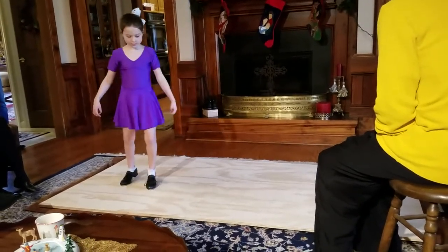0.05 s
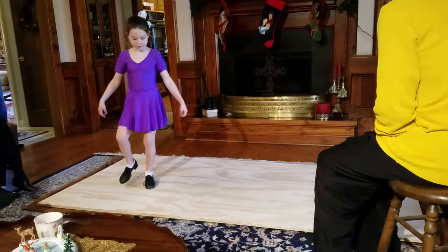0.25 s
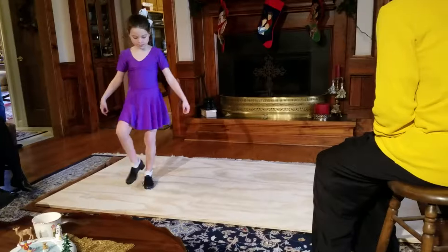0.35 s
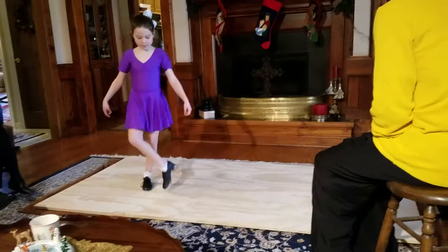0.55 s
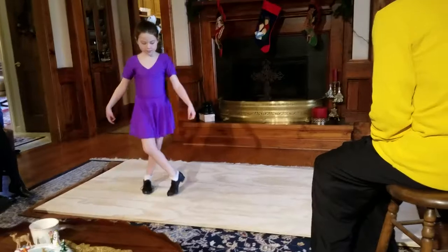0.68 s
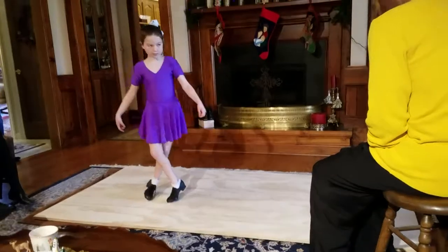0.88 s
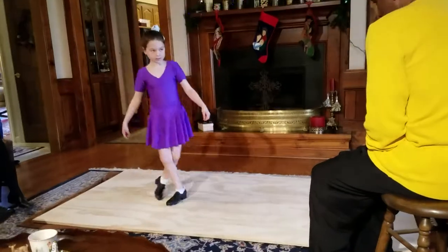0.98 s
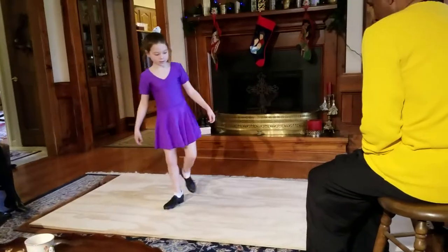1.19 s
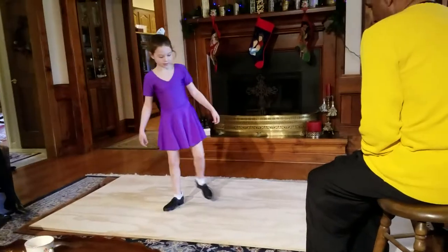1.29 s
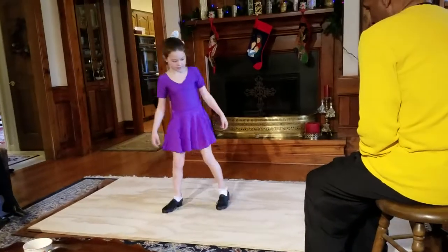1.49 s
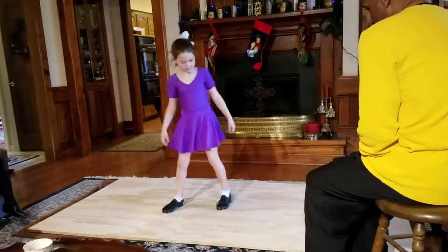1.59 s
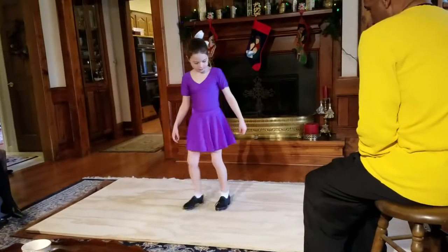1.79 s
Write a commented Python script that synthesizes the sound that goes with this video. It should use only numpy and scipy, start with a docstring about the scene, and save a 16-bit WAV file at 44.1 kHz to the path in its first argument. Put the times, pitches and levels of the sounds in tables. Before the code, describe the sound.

Tap shoes strike a ringing wooden board with a few unhurried, bright-edged knocks.

```python
"""A faint hiss, then slow steps in tap shoes on a wooden practice board laid over a rug in a living room.
Each step is a woody knock with a bright edge from the shoe's metal plate; the board rings,
the floor booms a little and the room answers with short echoes.
The hiss is the room's air and the microphone, which is a few metres away and louder on the left."""
import sys
import numpy as np
from scipy import signal
from scipy.fft import rfft, irfft, next_fast_len
from scipy.io import wavfile

SR = 44100
rng = np.random.default_rng(int(sys.argv[2]) if len(sys.argv) > 2 else 0)


def dump_mix(stems):
    """Bounce the given channels to the path in sys.argv[1] as a 16-bit WAV at rate SR."""
    frames = np.atleast_2d(stems).T  # one column per channel
    limited = np.clip(frames, -1, 1)  # hard clip at full scale
    pcm = np.round(limited * 32767).astype(np.int16)
    wavfile.write(sys.argv[1], SR, pcm)


N = 81585
T = np.arange(N) / SR
SIZE = next_fast_len(2 * N)
HZ = np.maximum(np.arange(SIZE // 2 + 1) * SR / SIZE, 1)


def from_db(db):
    """Turn decibels into a number to multiply by."""
    return 10 ** (np.asarray(db) / 20)


def fade(fade_s, db=0):
    """A level that starts at db and drops 60 dB every fade_s seconds (the fade time)."""
    return from_db(db - 60 * T / fade_s)


def at_hz(table):
    """Read a table's columns at every frequency, filling in between its rows."""
    points, *columns = np.transpose(table)
    return np.array([np.interp(np.log(HZ), np.log(points), column) for column in columns])


def colour(sound, db):
    """Turn each frequency up or down, letting nothing sound early (a minimum-phase filter)."""
    cepstrum = irfft(np.log(from_db(db)), SIZE)
    fold = 1 + np.sign(SIZE / 2 - np.arange(SIZE))
    fold[0] = 1
    return irfft(rfft(sound, SIZE) * np.exp(rfft(cepstrum * fold)), SIZE)[..., :N]


def stereo_noise(likeness):
    """Noise whose left and right range from unrelated (0) to the same (1) at each frequency."""
    mid, side = rfft(rng.standard_normal((2, SIZE)))
    shared = np.sqrt((1 + likeness) / 2) * mid
    opposite = np.sqrt((1 - likeness) / 2) * side * [[1], [-1]]
    return irfft(shared + opposite, SIZE)[:, :N]


# Tone of the hiss: f/Hz, left level/dB, right level/dB
HISS_TONE = [(25, -39.5, -42.5), (59.6, -42, -50.5), (140, -30.5, -39), (300, -34, -43.5),
             (460, -33.5, -42), (680, -38.5, -46), (1157, -32, -43), (2220, -39, -54.5), (4240, -55, -65.5),
             (6700, -60, -74), (8500, -73, -76.5), (10170, -62, -75.5), (12200, -45, -65.5),
             (15500, -55, -63)]
# How alike the hiss is on both sides: f/Hz, likeness/0-1
HISS_LIKENESS = [(150, 1), (500, 0.8), (1200, 0), (5000, .05)]
def hiss():
    """Steady air in the room and the microphone's own hiss."""
    return colour(stereo_noise(at_hz(HISS_LIKENESS)[0]), at_hz(HISS_TONE))


# How long the room keeps sounding: f/Hz, fade time/s
ROOM_FADES = [(70, 0.26), (180, 0.44), (500, 0.39), (1200, 0.33), (2800, .31), (6000, 0.23), (13000, 0.16)]
# Left against right: f/Hz, likeness of the room's sound/0-1, left minus right level/dB
STEREO = [(105, 0.78, 6), (278, 1, 9), (580, 0.78, 5.5), (1090, 0.22, 6), (2200, 0.23, 6.5),
          (4500, 0.51, 8), (8000, 0.35, 18.5), (14000, .5, 14)]
def room_tail(build_s, level_db=4):
    """Countless echoes blur into a wash that builds quickly; its highest notes die first."""
    noise = rfft(stereo_noise(at_hz(STEREO)[0]), SIZE)
    centres_hz, fades_s = np.transpose(ROOM_FADES)
    tail = 0
    for share, fade_s in zip(np.eye(len(centres_hz)), fades_s):
        band = irfft(noise * np.interp(np.log(HZ), np.log(centres_hz), share), SIZE)[:, :N]
        tail = tail + band * fade(fade_s)
    tail *= 1 - np.exp(-(T / build_s) ** 2)
    return from_db(level_db) * tail / np.sqrt(np.sum(tail ** 2) / 2)


# First echoes from floor, walls and ceiling: delay/s, level/dB
ECHOES = [(.0026, -9), (.0072, -15), (0.0135, -20), (.0195, -17.5), (.032, -19)]
def room_click(direct_db, echo_db, build_s, scatter_s=0.0005):
    """A click reaches the microphone straight, as echoes that shift with each step, and as a wash."""
    sound = room_tail(build_s)
    sound[:, 0] += from_db(direct_db)
    for delay_s, db in ECHOES:
        arrival = int(abs(delay_s + scatter_s * rng.normal()) * SR)
        sound[:, arrival] += from_db(db + echo_db)
    return sound


def floor_boom(hz=67.4, rise_s=0.092):
    """The deep note of floor and room swells under the dancer's weight."""
    swell = 1 - np.exp(-T / rise_s)
    return swell * fade(0.28, db=-22) * np.sin(2 * np.pi * hz * T)


# Notes of the wooden board, before the foot changes their length: f/Hz, level/dB, fade time/s
BOARD_NOTES = [(177, -10.5, 0.86), (222.4, 6, .35), (318, -1.5, 0.3), (400, -10, 0.25), (479.9, -1.5, 0.39),
               (512, -0.5, 0.4), (546, 4.5, .3), (592, 0, 0.24), (649.2, 5, 0.26), (721, 4, 0.38),
               (861, -1, 0.34), (892, -6, 0.25), (1034, -7, 0.2), (1084, -0.5, 0.27), (1158, -12.5, 0.44),
               (1300, -4.5, 0.4), (1640, -11.5, 0.19), (1934, -15.5, 0.26)]
def board_ring(level_db=-23.5, spread_db=4.5, rise_s=0.0042):
    """The board rings; each note's strength is left to chance."""
    ring = 0
    for k, (hz, db, fade_s) in enumerate(BOARD_NOTES):
        strength = fade(fade_s, level_db + db + spread_db * rng.normal())
        phase = 0.39 * rng.normal(size=(2, 1))  # left and right swing slightly apart
        ring = ring + (-1) ** k * strength * np.sin(2 * np.pi * hz * T + phase)
    return ring * (1 - np.exp(-(T / rise_s) ** 2))


# Very short notes where sole meets board: f/Hz, level/dB, fade time/s
CRACK_NOTES = [(362.3, -37.5, 0.027), (691, -37, 0.0083), (1252, -36, 0.033), (1898, -32, 0.021)]
def crack():
    """The first sharp swings of sole and board, heard straight from the foot."""
    return sum(fade(fade_s, db) * np.cos(2 * np.pi * hz * T) for hz, db, fade_s in CRACK_NOTES)


# Tone of the metal plate's click: f/Hz, level/dB
PLATE_TONE = [(300, -16.5), (1500, -28), (2700, -16.5), (4000, -26), (5500, -32.5), (8300, -50),
              (12000, -44), (16000, -46.5)]
def metal_plate(tick_above_hz=11400, clap_delay_s=0.01, tone_boost_db=26.5):
    """The metal plate ticks with its edge, then claps flat a moment later."""
    tick = rng.standard_normal((2, N)) * fade(0.09, db=-32.5)
    tick = signal.sosfilt(signal.butter(4, tick_above_hz, "high", fs=SR, output="sos"), tick)
    clap = rng.standard_normal((2, N)) * (T > clap_delay_s) * fade(0.038)
    clap = from_db(-0.5) * clap / np.sqrt(np.sum(clap ** 2) / 2)
    click = room_click(direct_db=-15.5, echo_db=3, build_s=0.012)
    return tick + colour(clap + click, tone_boost_db + at_hz(PLATE_TONE)[0])


# Tone of a knock on the board: f/Hz, level/dB
KNOCK_TONE = [(40, -13), (90, -23.5), (135, -3), (200, -5.5), (400, 2), (750, -2.5), (1100, -4),
              (1600, -11), (2400, -12), (5000, -27.5)]
def knock(tilt_db, cutoff_hz, crack_db, tone_boost_db=27):
    """The shoe hits the wood: the harder the contact, the brighter the knock."""
    octaves = np.log2(np.maximum(HZ, 130) / 500)  # the tilt pivots at 500 Hz and is flat below 130 Hz
    treble_loss_db = 10 * np.log10(1 + np.minimum(HZ / cutoff_hz, 2) ** 16)
    blow = room_click(direct_db=-10, echo_db=0.5, build_s=0.0083) + from_db(crack_db) * crack()
    return colour(blow, tone_boost_db + at_hz(KNOCK_TONE)[0] + tilt_db * octaves - treble_loss_db)


def step(tilt_db, cutoff_hz, plate_db, boom_db, crack_db, ring_db, length, usual_fade_s=0.35):
    """One touch of the shoe. A length below 1 is the resting foot damping it; above 1 it rings longer."""
    sound = -knock(tilt_db, cutoff_hz, crack_db)
    sound += from_db(plate_db) * metal_plate()
    sound += from_db(ring_db) * board_ring()
    sound += from_db(boom_db) * floor_boom()
    damping_db = 60 * np.minimum(T / usual_fade_s, 1) * (1 / length - 1)
    return sound * from_db(-damping_db)


# Four firm steps and the lighter touches around them: t/s, level/dB, treble tilt/dB per octave,
# cut-off f/Hz, plate level/dB, boom level/dB, crack level/dB, ring level/dB, length/factor
STEPS = [(0.1850, -39.5, -15, 593, -39, -34, -6, -2, 1.6),
         (0.211, -1, 0.5, 2100, -13.5, 3, -9.5, 0.5, 0.96),
         (0.306, -26.5, -5, 600, -39, -3, -10.5, 4, 0.48),
         (0.6768, -0.5, 0.5, 2800, -4.5, -27, -2.5, 2, 1.035),
         (0.9950, -38, 2.5, 900, -24, -30, -9, -1.5, 3), (1.0575, -19.5, -6.5, 1710, -27, -15, 1, 2.5, .9),
         (1.0736, -4.5, -1, 1954, -15.5, -15, 2, -3.5, 0.86),
         (1.5102, -5, 2.5, 2900, 6, -25, 3.5, -4.5, 0.87), (1.784, -19, -5, 2290, -14, -17, 5, 2, 0.75)]
def scene():
    """The steps, weaker on the right, over the hiss."""
    steps = np.zeros((2, N))
    for start_s, db, *touch in STEPS:
        start = int(start_s * SR)
        steps[:, start:] += from_db(db) * step(*touch)[:, :N - start]
    steps[1] = colour(steps[1], -at_hz(STEREO)[1])
    return steps + hiss()


def record(dry, low_cut_hz=40, high_cut_hz=16800):
    """Cut the deepest bass, round off the loudest peaks and cut the highest treble."""
    lean = signal.sosfilt(signal.butter(2, low_cut_hz, "high", fs=SR, output="sos"), dry)
    rounded = lean / (1 + lean ** 10) ** (1 / 10)
    return signal.sosfilt(signal.cheby2(16, 60, high_cut_hz, fs=SR, output="sos"), rounded)


dry = scene()
out = record(dry)
dump_mix(out)
```